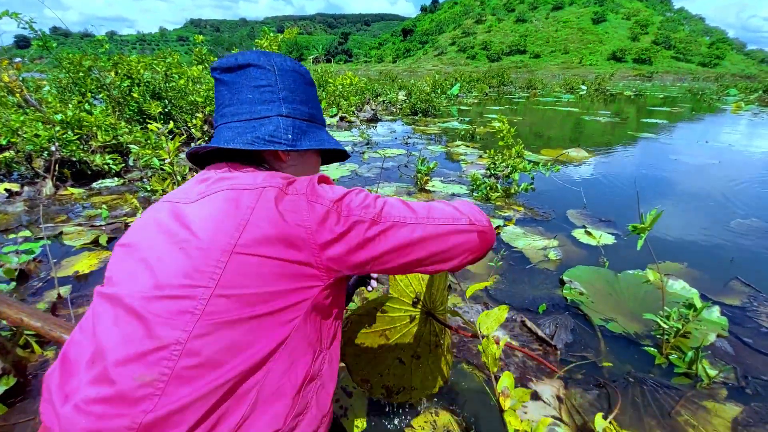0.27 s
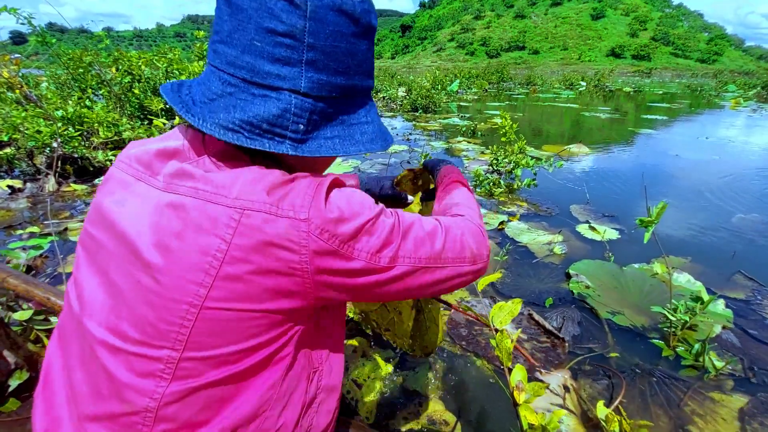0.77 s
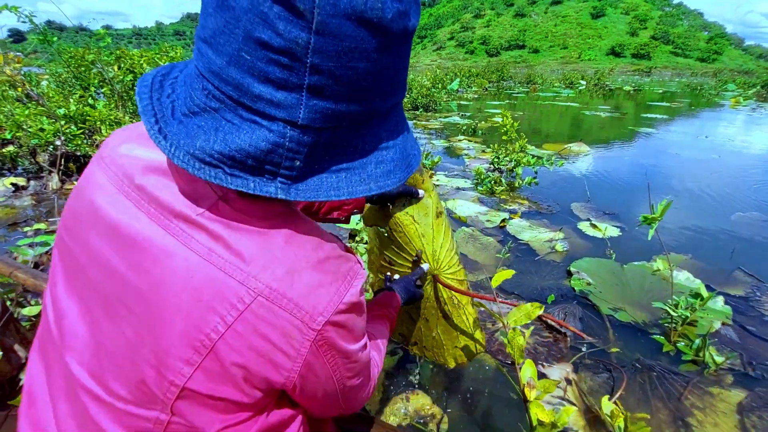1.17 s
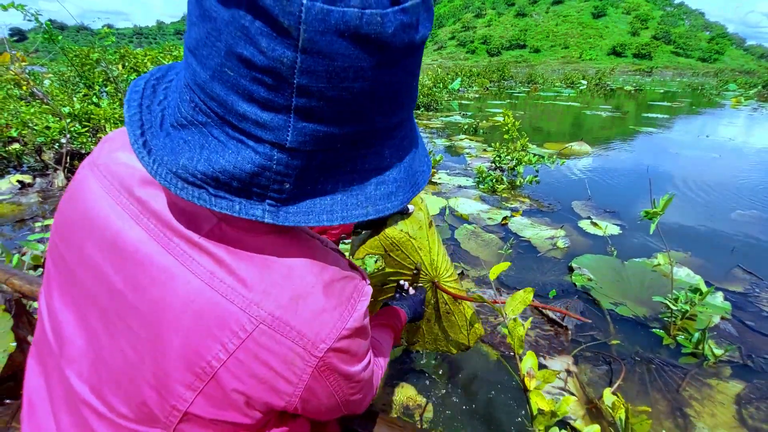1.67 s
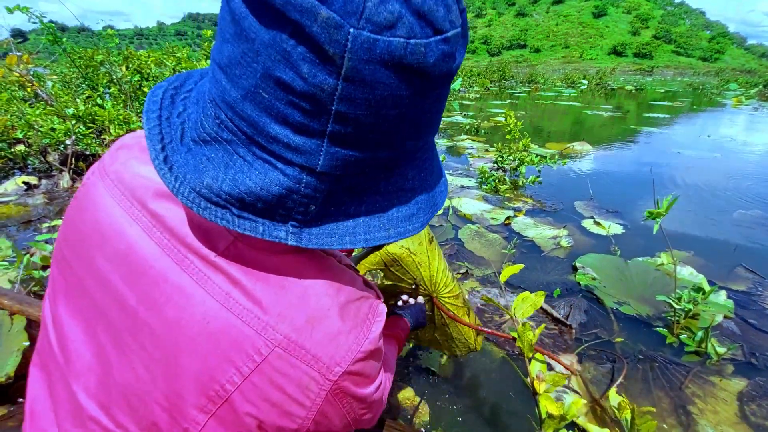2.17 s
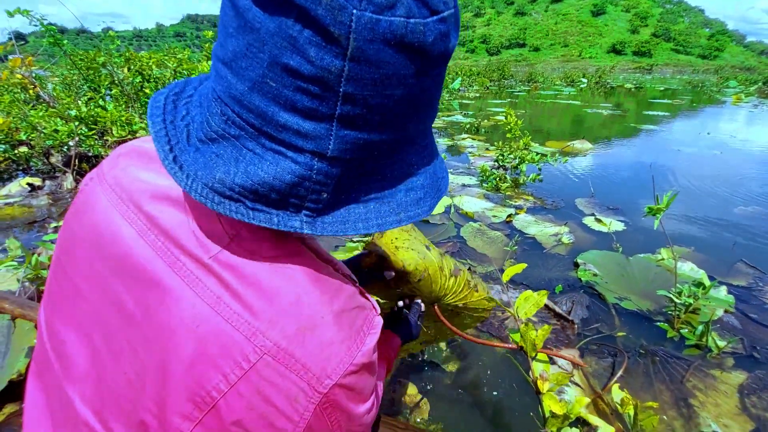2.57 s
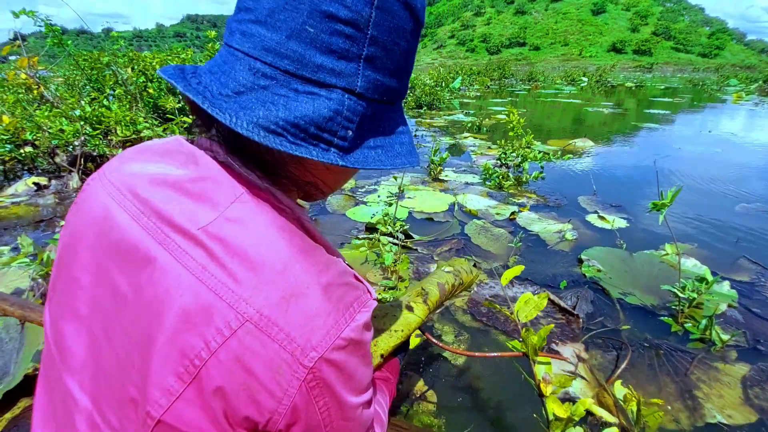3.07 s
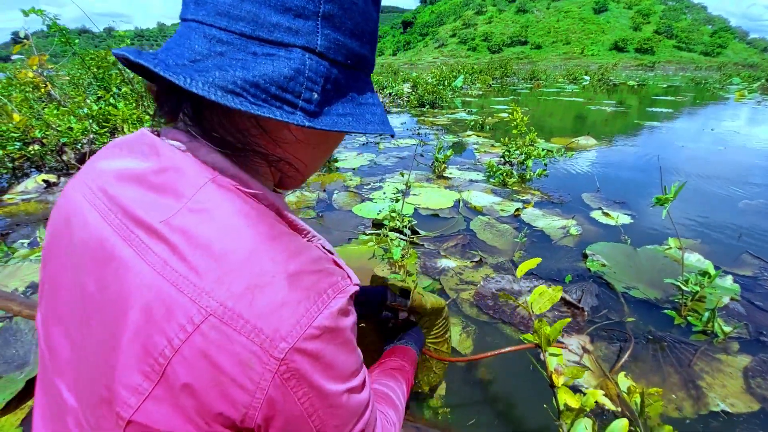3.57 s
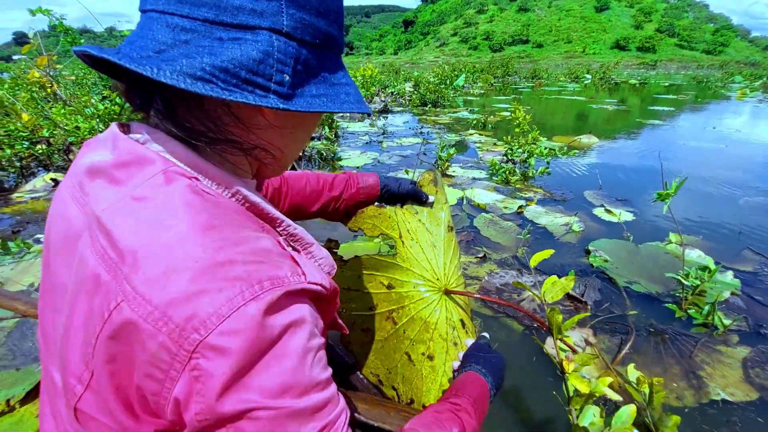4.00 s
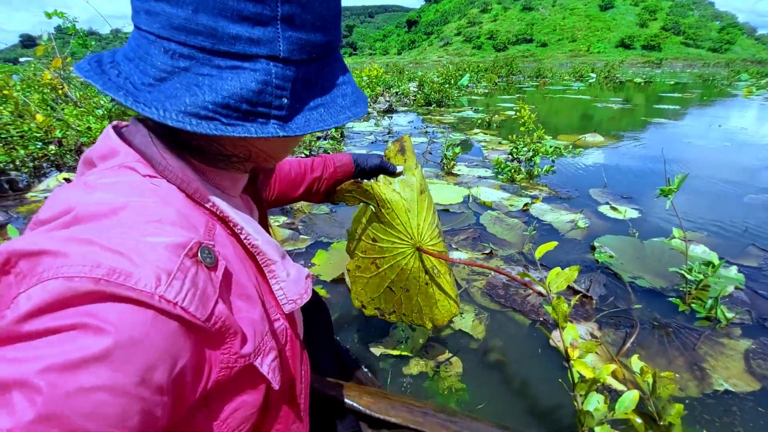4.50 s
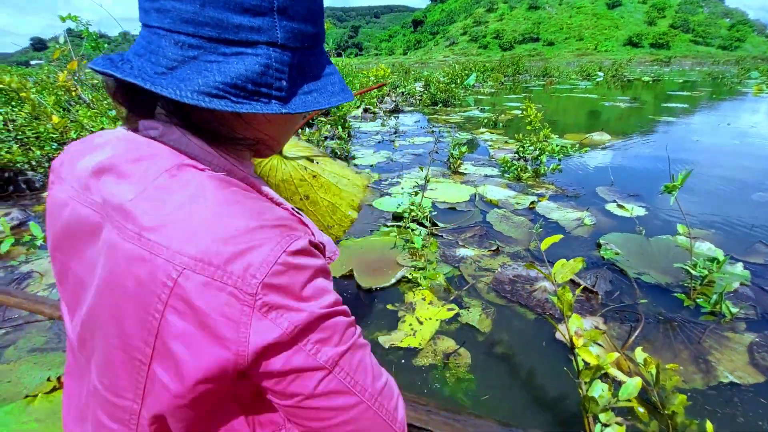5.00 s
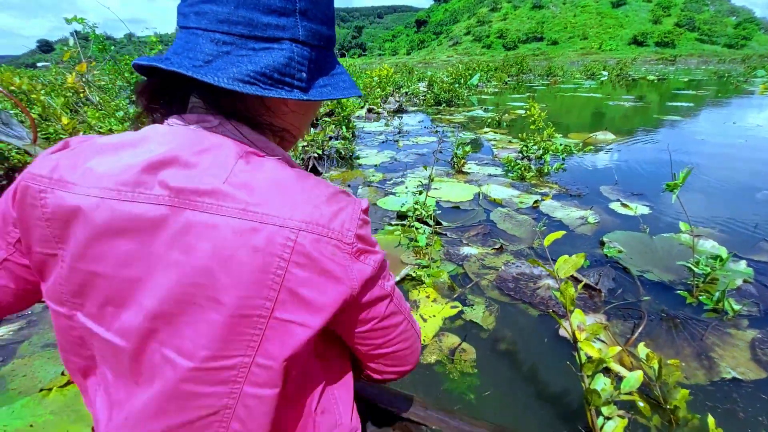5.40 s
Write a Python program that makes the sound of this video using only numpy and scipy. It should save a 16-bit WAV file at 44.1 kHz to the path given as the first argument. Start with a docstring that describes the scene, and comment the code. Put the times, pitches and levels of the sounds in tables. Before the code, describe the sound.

A big wet leaf is crinkled and folded over trickling marsh water, with drips, a small tool clink and a final paddle splash.

```python
"""Folding a wet lotus leaf in a boat

Someone in a wooden boat lifts a big wet leaf out of a marsh and folds it, a little right of the microphone.
Swarms of damped resonances make its crackle and trickle; filtered noise makes the rub of sleeves and the slosh.
Gliding sines are air pockets ringing in the water. A small tool, perhaps a knife, clinks on the boards as sums
of decaying modes, and at the end a paddle digs in as froth and spray. Light wind rumbles on the microphone
as low noise and slow pulses, and a far bird whistles in arched sines."""
import sys
import numpy as np
from scipy import signal
from scipy.fft import rfft, irfft
from scipy.io import wavfile
from scipy.ndimage import uniform_filter1d

SR = 44100
rng = np.random.default_rng(int(sys.argv[2]) if len(sys.argv) > 2 else 0)


def put_to_file(sound):
    """Save the sound as 16-bit audio at rate SR, in the file named by the first command-line argument."""
    columns = np.atleast_2d(sound).T  # one column per channel
    safe = np.clip(columns, -1, 1)
    whole_steps = np.round(safe * 32767)
    wavfile.write(sys.argv[1], SR, whole_steps.astype(np.int16))


N = 249165
T = np.arange(N) / SR
SIDES = np.array([[1], [-1]])  # left, right


def amp(db):
    """Level law: decibels to amplitude ratio."""
    return 10 ** (np.asarray(db) / 20)


def unit(x):
    """Normalisation to unit rms."""
    return x / np.sqrt(np.mean(x ** 2))


def curves(table):
    """Linear interpolation: each column after the first becomes a curve over time."""
    s, *columns = np.transpose(table)
    return [np.interp(T, s, c) for c in columns]


def add(out, s, sound):
    """Superposition: mix a sound in at a time, cut at the end of the scene."""
    i = int(np.clip(s * SR, 0, N - 1))
    out[i:i + len(sound)] += sound[:N - i]


def colour(x, spectrum):
    """Linear filtering by a (Hz, dB) spectrum, falling 12 dB per octave below its first point; rms 1."""
    hz, db = np.transpose(spectrum)
    f = np.maximum(np.arange(N // 2 + 1) * SR / N, 1)
    below = np.minimum(f / hz[0], 1) ** 2
    response = below * amp(np.interp(np.log(f), np.log(hz), db))
    return unit(irfft(rfft(x) * response, N))


def noise(spectrum):
    """Coloured noise: white noise shaped by a spectrum; rms 1."""
    return colour(rng.standard_normal(N), spectrum)


def walk(rate):
    """Random modulation: straight lines between normal random values, `rate` of them per second."""
    return np.interp(T * rate, np.arange(1000), rng.standard_normal(1000))


def fade(t, t60, rise):
    """Damping: quick rise, then exponential decay by 60 dB in t60 seconds; peak 1."""
    shape = (1 - np.exp(-t / rise)) * np.exp(-np.log(1000) * t / t60)
    return shape / shape.max()


def burst(hz, spread, t60, rise):
    """Damped band-limited noise, a puff of at most a quarter second with a peak near 1."""
    t = T[:SR // 4]
    edges = [hz / (1 + spread), min(hz * (1 + spread), SR / 2 - 2000)]
    band = signal.butter(2, edges, "band", fs=SR, output="sos")
    hiss = signal.sosfilt(band, rng.standard_normal(len(t)))
    return unit(hiss) * fade(t, t60, rise) / 2


def ping(hz, t60, glide=0, rise=0.00085, phase=0):
    """One damped resonance, whose pitch may glide in octaves per second."""
    t = T[:int(t60 * SR) + 2]
    cycles = np.cumsum(hz * 2 ** (glide * t)) / SR
    return np.sin(phase + 2 * np.pi * cycles) * fade(t, t60, rise)


def ring(modes, rise):
    """Modal superposition: all the modes of a struck body at random phases, peak 1."""
    out = np.zeros(SR // 4)
    for hz, db, t60 in modes:
        tone = ping(hz, t60, rise=rise, phase=rng.uniform(0, 2 * np.pi))
        out[:len(tone)] += amp(db) * tone
    return out / np.abs(out).max()


def grains(centre_hz, octaves, cycles, scatter_db, glide, count):
    """Granular superposition: tiny resonances about a pitch, mostly faint, a few strong; evened to rms near 1."""
    out, centre_hz = np.zeros(N), np.broadcast_to(centre_hz, N)
    for when, pitch, size, life in rng.random((count, 4)):
        hz = centre_hz[int(when * N)] * 2 ** (octaves * (2 * pitch - 1))
        t60 = cycles * (.5 + life) / hz
        add(out, when * T[-1], amp(-scatter_db * np.log(1 - size)) * ping(hz, t60, glide))
    slow_power = uniform_filter1d(out ** 2, SR // 12)
    return out / np.sqrt(slow_power + 1e-9)


def place(x, pan_db, scatter, lag_s=0):
    """Scattering: the right port hears directly; the left partly by way of the body and the boat, which smear it.

    pan_db is left minus right; scatter is the smeared share of the left port's power; lag_s delays the rest."""
    t = T[:SR // 20]
    smear = rng.standard_normal(len(t)) * fade(t, 0.021, .0001)
    scattered = signal.fftconvolve(x, smear / np.linalg.norm(smear))[:N]
    late = np.roll(x, round(lag_s * SR))
    left = np.sqrt(1 - scatter) * late + np.sqrt(scatter) * scattered
    return np.array([left * amp(pan_db / 2), x * amp(-pan_db / 2)])


def swells(movements, rest_db):
    """Addition of powers: movements build as a Gaussian and die exponentially over a resting level; gives a gain."""
    power = amp(rest_db) ** 2
    for s, swell_s, fade_s, db in movements:
        away = np.where(T < s, ((T - s) / swell_s) ** 2, (T - s) / fade_s)
        power = power + (amp(db) * np.exp(-away)) ** 2
    return np.sqrt(power)


def outdoors():
    """Turbulent pressure: low wind noise, partly independent at each port, over the quiet hiss of the open marsh."""
    # strength of the wind on the microphone: start_s, relative level_db
    wind_strength = [(0.0, -61), (0.6, -58.5), (0.75, -58.5), (0.91, -63), (1.67, -59), (1.73, -58.5),
                     (2.86, -56.5), (3.01, -58.5), (3.9, -63), (4.31, -58), (4.69, -58), (5.02, -65),
                     (5.44, -57), (5.65, -59)]
    # spectrum of the wind rumble: frequency_hz, relative density_db
    gust = [(22, -30), (32, -18), (46, 6.5), (62, 5.5), (90, 2), (125, 1.5), (166, -6.5), (260, -20.5),
            (500, -47.5)]
    # spectrum of the open air: frequency_hz, relative density_db
    air_spectrum = [(150, 3), (400, -3.5), (750, -8), (1050, -12), (1500, -26), (2300, -20), (3400, -30),
                    (4500, -14), (6000, -26), (8500, -42.5), (11000, -14), (14000, -31), (16000, -22)]
    gust_db = curves(wind_strength)[0] + 2 + 2 * walk(22)
    wind = (noise(gust) + 0.66 * SIDES * noise(gust)) * amp(gust_db)
    air_db = -70.5 - 1.5 * SIDES + 0.27 * walk(8.5)  # the right side is louder
    air = (noise(air_spectrum) + 0.97 * SIDES * noise(air_spectrum)) * amp(air_db)
    return wind + air


def buffets():
    """Damped oscillation: each buffet of wind pushes the two ports unequally through a few slow cycles."""
    # single buffets: start_s, peak_db (mean of the ports), pitch_hz, t60_s, left_minus_right_db
    pushes = [(0.632, -45, 79, .07, 26), (0.663, -45, 55.7, 0.17, 13), (0.701, -42, 91, 0.079, 13),
              (2.621, -40, 60, 0.15, -9), (2.856, -39.5, 82, 0.14, .5), (2.924, -44, 99.6, 0.18, -22),
              (3.353, -46, 85, 0.1, -10), (4.136, -44.5, 82, 0.1, -19), (5.43, -48.5, 100, 0.29, 16)]
    out = np.zeros((2, N))
    for s, db, hz, t60, pan_db in pushes:
        push = ping(hz, t60, rise=0.0011)
        add(out[0], s, amp(db + pan_db / 2) * push)
        add(out[1], s, amp(db - pan_db / 2) * push)
    return out


def bird():
    """Frequency modulation: thin whistles from the reeds whose pitch follows an arch and trembles."""
    # whistles: start_s, length_s, start_hz, middle_hz, end_hz, level_db
    whistles = [(2.23, .06, 2750, 2900, 3000, -75), (2.68, .05, 3550, 3620, 3550, -73),
                (2.87, .115, 2510, 2510, 2410, -73), (3.21, .175, 3750, 4370, 3450, -67),
                (3.48, .14, 3400, 3600, 2700, -69)]
    out = np.zeros(N)
    for s, length, start_hz, middle_hz, end_hz, db in whistles:
        u = np.linspace(0, 1, int(length * SR))
        arch = np.polyfit([0, .5, 1], [start_hz, middle_hz, end_hz], 2)
        hz = np.polyval(arch, u) * (1 + 0.0064 * walk(138)[:len(u)])
        flutter_db = 3 * walk(70)[:len(u)]
        envelope = np.sqrt(np.abs(np.sin(np.pi * u)))
        add(out, s, amp(db + flutter_db) * envelope * np.sin(2 * np.pi * np.cumsum(hz) / SR))
    return place(out, 0, .2)


def boat():
    """Damped hull resonance and friction: dull knocks, and a jacket rubbing close and wide as the weight shifts."""
    # shifts of the body's weight: height_s, swell_s, fade_s, relative level_db
    shifts = [(.18, 0.056, 0.14, -59.5), (.42, 0.027, 0.035, -48.5), (1.25, 0.45, 0.3, -64),
              (1.73, 0.075, 0.16, -56), (2.57, 0.16, 0.13, -61), (3.01, 0.25, 0.2, -57.5),
              (3.31, 0.075, 0.048, -59.5), (4.2, 0.27, 0.23, -61), (4.71, 0.016, 0.055, -51),
              (5.05, 0.024, 0.095, -53), (5.16, 0.02, 0.021, -46.5), (5.53, 0.025, 0.065, -51.5)]
    # spectrum of the rubbing jacket: frequency_hz, relative density_db
    cloth = [(100, -2), (190, 0), (300, 0.5), (450, -12.5), (800, -19), (2000, -67.5)]
    # dull knocks on the hull: start_s, peak_db, pitch_hz, t60_s
    knocks = [(0.311, -46, 197, .27), (2.129, -40, 201, 0.023), (4.844, -49, 137.3, 0.32),
              (5.146, -57, 246, .08)]
    shifting = swells(shifts, rest_db=-66) * amp(-2)
    out = noise(cloth) * shifting
    for s, db, hz, t60 in knocks:
        add(out, s, amp(db) * ping(hz, t60, rise=0.00098))
    return out + 0.35 * SIDES * noise(cloth) * shifting


def droplets(count=120):
    """Random impacts: tiny drops tick on the wet leaf all the while, each a short band of noise."""
    out = np.zeros(N)
    for when, pitch, size in rng.random((count, 3)):
        db = -56 + 3 * min(-np.log(1 - size), 3)
        add(out, when * T[-1], amp(db) * burst(9000 + 5500 * pitch, .2, .012, .0002))
    return place(out, -2.5, 1.0)


def water():
    """Bubble resonance: trapped air pockets ring as gliding sines, beside noisy slaps of water and wet leaf."""
    # ringing air pockets: start_s, relative peak_db, pitch_hz, t60_s, glide_octaves_per_s
    bubbles = [(0.168, -48, 540, 0.05, -7), (.4254, -31.5, 1178, 0.026, 2), (0.4258, -43, 3680, .025, 9),
               (.458, -47.5, 1150, 0.034, 2), (.554, -58.5, 1146, 0.085, 1), (0.609, -51, 4980, .025, -15),
               (0.651, -47, 4800, 0.025, -3), (.741, -49, 570, 0.022, 0), (.8068, -41.5, 4420, 0.021, 3),
               (1.2, -49.5, 543, 0.033, -16), (1.287, -50, 575, 0.087, -8), (1.641, -59, 2250, 0.053, 1),
               (1.73, -40.5, 574, 0.032, -10), (2.055, -48.5, 800, 0.081, 38.5),
               (1.809, -58, 860, 0.023, 5), (2.057, -57.5, 1900, 0.074, 22), (2.216, -63.5, 2210, .09, 2),
               (2.336, -47.5, 1320, 0.025, -5), (2.601, -40, 5300, 0.011, -5), (2.637, -48, 3270, .04, 8),
               (2.775, -57.5, 2420, .047, 6), (3.419, -54, 3340, .03, 8), (3.559, -57, 2350, 0.035, 0),
               (3.652, -59, 1920, 0.052, -10), (4.565, -56, 2980, 0.031, -8), (4.802, -56, 2970, .03, -2),
               (5.5209, -41.5, 2460, 0.08, -2.5), (5.584, -33.5, 1520, 0.011, 40),
               (5.593, -34.5, 1590, 0.024, -50), (5.5986, -33.5, 1215, 0.045, -66.5),
               (5.608, -36.5, 497, 0.026, 2), (5.632, -33, 1215, 0.031, -5),
               (5.6425, -29, 825, 0.0083, -23)]
    # small slaps: start_s, relative peak_db, centre_hz, t60_s
    slaps = [(0.312, -54.5, 1660, 0.38), (0.42, -42.5, 1460, 0.098), (0.664, -50.5, 2740, 0.11),
             (.803, -48.5, 1490, .088), (1.675, -51, 704, 0.11), (1.729, -47, 815, 0.12),
             (1.787, -52.5, 740, 0.24), (1.995, -56.5, 1650, 0.067), (2.134, -52, 475, 0.055),
             (2.055, -58, 2180, .077), (2.099, -54.5, 1590, 0.063), (2.337, -47, 1600, 0.028),
             (2.358, -52, 3200, .04), (2.582, -47, 610, 0.079), (2.633, -45, 3280, 0.08),
             (2.992, -44, 3370, 0.057), (2.998, -42.5, 800, 0.067), (3.087, -51, 756, 0.22),
             (3.168, -49.5, 800, 0.06), (3.311, -51.5, 660, 0.33), (3.583, -45.5, 3440, 0.064),
             (4.045, -54.5, 1620, 0.16),  (4.7001, -34.5, 740, 0.054), (4.701, -43, 2180, 0.059),
             (4.7605, -38.5, 890, 0.045), (5.519, -34, 2730, 0.064)]
    out = np.zeros(N)
    for s, db, hz, t60, glide in bubbles:
        add(out, s, amp(db) * ping(hz, t60, glide, rise=0.00041))
    for s, db, hz, t60 in slaps:
        add(out, s, amp(db) * burst(hz, 0.39, t60, 0.00017))
    return place(out, -8, 0.084, lag_s=.0001)


def paddle():
    """Entrained air and spray: the paddle blade churns up froth and bubbles and throws fine drops."""
    # the stroke: time_s, relative churn_db, relative spray_db
    stroke_levels = [(5.498, -80, -89), (5.507, -46, -56), (5.521, -42.5, -58), (5.535, -46, -56),
                     (5.563, -44, -54.5), (5.578, -52.5, -60), (5.6, -42, -52), (5.62, -43.5, -60),
                     (5.65, -39, -59)]
    # spectrum of the churned water: frequency_hz, relative density_db
    churn = [(120, -17), (400, -13), (800, 4.5), (1500, 6), (2500, 1), (4000, -7.5), (8000, -27)]
    # spectrum of the fine spray: frequency_hz, relative density_db
    spray = [(1500, -20), (4000, 5.5), (6000, -6), (9000, -9), (12500, -3.5), (16000, -16)]
    churn_db, spray_db = curves(stroke_levels)
    bubbles = grains(1150, 1.35, cycles=10, scatter_db=2, glide=10, count=4000)
    froth = unit(noise(churn) + amp(-3) * bubbles)
    stroke = froth * amp(churn_db) + noise(spray) * amp(spray_db)
    begun = T > stroke_levels[0][0]
    return place(stroke * begun, -5.0, 0.82, lag_s=.00015)


def knife():
    """Modal impact: every bounce rings blade, edge and board in its own mix; the hull scatters a short tail."""
    # landing and bounces: start_s, relative blade_db, relative edge_db, relative board_db
    bounces = [(4.6139, -18, -33, -36.5), (4.6262, -12.5, -21.5, -23), (4.629, -33, -7.5, -28),
               (4.6723, -38.5, -47.5, -27.5), (4.6754, -44, -22, -40.5)]
    # modes of the blade: frequency_hz, relative level_db, t60_s
    blade_modes = [(4660, -1, .017), (4800, -1, .015), (5020, -3, .012), (5310, -1, .013)]
    # modes of its edge: frequency_hz, relative level_db, t60_s
    edge_modes = [(7650, -12, .018), (8890, -2, .021), (9700, -4, .011), (10150, -4, .012),
                  (10700, -4, .014), (11100, -5, .014), (12350, -4, .012), (12720, 0, .014),
                  (13100, -2, .012), (13780, -4, .012), (14500, -9, .011)]
    # modes of the board: frequency_hz, relative level_db, t60_s
    board_modes = [(482, -9, 0.05), (706, -11.5, 0.025), (920, -23.5, 0.044), (1366, -3, 0.02),
                   (1770, -12.5, 0.069), (2135, -0.5, 0.019), (2446, -1, 0.014), (3240, -14, 0.0085)]
    out = np.zeros(N)
    for s, blade_db, edge_db, board_db in bounces:
        clatter = amp(-33) * burst(4200, .9, .09, .002)
        crack = amp(-3) * burst(10500, 0.31, 0.014, .0001)
        thud = amp(-3) * burst(2800, 1.7, 0.05, .0002)
        blade = ring(blade_modes, rise=.001) + clatter
        edge = ring(edge_modes, rise=0.000067) + crack
        board = ring(board_modes, rise=0.000088) + thud
        add(out, s, amp(blade_db) * blade + amp(edge_db) * edge + amp(board_db) * board)
    return place(out * amp(-1.5), -8.0, 0.92, lag_s=.000023)


def ticks():
    """Impulsive excitation: drops and creases tick as a bright crack with a lower snap of the leaf under it."""
    # ticks: start_s, relative peak_db, t60_s, snap_db (relative to the crack)
    leaf_ticks = [(0.393, -42, .013, -26), (.414, -37, .027, -15), (0.4205, -32.5, .025, -13.5),
                  (0.4263, -38.5, 0.023, -9), (0.432, -33, 0.017, -22), (.4533, -42, 0.015, -19),
                  (0.4578, -45, .033, -1), (0.616, -48, .012, -22), (.664, -49.5, 0.024, -4),
                  (.806, -63, 0.026, -1), (.874, -48.5, 0.027, -1), (1.189, -45, 0.022, -21),
                  (1.407, -42, .018, -11), (1.615, -45, 0.012, -36), (1.864, -48.5, 0.022, -35),
                  (2.0, -41, 0.018, -30), (2.052, -59, .015, -24), (2.1355, -36, 0.019, -15),
                  (2.3344, -37.5, 0.022, -14), (2.3935, -44, .01, -25), (2.4413, -44.5, .019, -7),
                  (2.581, -39.5, 0.018, -5), (2.586, -34, 0.014, -25), (3.177, -52, .019, -22),
                  (3.313, -46, 0.02, 3), (3.5195, -48, 0.045, -0.5), (3.735, -53, .014, -6),
                  (4.075, -49.5, 0.032, -4.5), (4.758, -37.5, 0.016, 0), (4.939, -46, 0.0085, -7.5),
                  (4.977, -51, .015, -1), (5.002, -40, 0.0089, -13.5), (5.072, -48.5, .012, -32),
                  (5.5203, -40.5, .014, 5.5), (5.642, -43, 0.018, 5.5)]
    out = np.zeros(N)
    for s, db, t60, snap_db in leaf_ticks:
        crack = burst(13150, 0.31, t60, 0.0001)
        snap = amp(snap_db) * burst(4800, 0.29, t60, 0.0001)
        add(out, s, amp(db) * (crack + snap))
    return place(out, -8.5, 0.8, lag_s=.000023)


def leaf_motion():
    """Common excitation: each stroke drives crinkle, rubbing and running water; also gives the crease pitch in Hz."""
    # hands on the leaf: height_s, swell_s, fade_s, relative crinkle_db, rub_db and water_db, crease_hz
    strokes = [(.02, 0.06, 0.42, -68, -66.5, -72, 3950), (.18, 0.014, 0.021, -66.5, -78, -63, 2180),
               (0.429, .025, 0.11, -59, -58, -65.5, 3670), (.72, 0.026, 0.035, -60.5, -61.5, -82, 4300),
               (0.784, 0.05, 0.14, -60.5, -58.5, -62.5, 3630), (1.14, 0.056, 0.086, -63, -71, -62, 2270),
               (1.28, 0.055, 0.13, -68.5, -66.5, -60.5, 3340), (1.52, 0.042, 0.052, -68, -75, -92, 3500),
               (1.67, 0.11, 0.077, -68, -66, -88, 4440), (1.77, 0.071, 0.043, -68.5, -68, -64, 2530),
               (2.05, 0.052, 0.2, -71, -74.5, -66.5, 2400), (2.29, 0.023, 0.021, -69, -75, -81, 3930),
               (2.355, 0.017, 0.11, -71.5, -68, -67, 2400), (2.45, 0.022, 0.14, -64.5, -67, -65, 4000),
               (2.62, 0.061, 0.14, -62.5, -62, -68, 4020), (3.0, 0.013, 0.13, -61, -67, -57, 2640),
               (3.17, .04, 0.059, -63.5, -76, -66.5, 2430), (3.33, 0.07, 0.27, -69.5, -68.5, -84, 4480),
               (3.59, 0.055, 0.11, -61, -64, -71, 2710), (3.93, 0.074, 0.11, -69.5, -71.5, -64, 2650),
               (4.05, 0.034, 0.068, -59, -65, -59, 2100), (4.2, 0.065, 0.1, -62, -58, -57, 2490),
               (4.27, 0.036, 0.22, -60.5, -63, -64, 2040), (4.52, 0.15, 0.027, -67, -70, -85, 4210),
               (4.76, 0.099, 0.071, -65, -69, -56, 3470), (4.98, 0.099, .03, -72, -73.5, -68.5, 4700),
               (5.15, 0.17, 0.27, -69.5, -74, -63.5, 2430)]
    s, swell_s, fade_s, crinkle_db, rub_db, water_db, crease_hz = np.transpose(strokes)
    # the resting levels are low but never silent: the leaf is never quite still
    effort = swells(zip(s, swell_s, fade_s, crinkle_db), rest_db=-87.5)
    rub = swells(zip(s, swell_s, fade_s, rub_db), rest_db=-79.5)
    flow = swells(zip(s, swell_s, fade_s, water_db), rest_db=-76.5)
    return effort, rub, flow, np.interp(T, s, crease_hz)


def handling():
    """Crackling and friction: water runs off the leaf; its skin crinkles at the fold's pitch and rubs on sleeves."""
    # spectrum of sloshing water: frequency_hz, relative density_db
    slosh_spectrum = [(250, -11), (480, 5.5), (900, -4), (1400, 0), (2200, -9), (4000, -26)]
    # spectrum of the rubbing: frequency_hz, relative density_db
    rustle_spectrum = [(3000, -1), (6000, -2.5), (9000, -5.5), (12000, -3.5), (14500, -2.5), (16500, -33)]
    # where the leaf is held: time_s, relative left_minus_right_db
    leaf_pan = [(0.0, -5), (0.57, -3), (0.73, -9), (0.9, -0.5), (1.08, -10.5), (3.47, -9), (4.26, -5),
                (4.55, -9)]
    effort, rub, flow, fold_hz = leaf_motion()
    trickle = grains(815.5, 1, cycles=43, scatter_db=4.5, glide=4.3, count=3200) * amp(-5)
    slosh = noise(slosh_spectrum) * amp(-4)
    crinkle = grains(fold_hz, 0.46, cycles=22, scatter_db=4.0, glide=15, count=3200) * amp(-5)
    crumple = grains(3000, 0.8, cycles=4.0, scatter_db=2.8, glide=0, count=9000) * amp(-4)
    catches = np.repeat(rng.standard_normal(N // 64 + 1), 64)[:N]  # catches and slips every 1.5 ms
    rough = rng.standard_normal(N) * amp(3.8 * catches)
    rustle = colour(rough, rustle_spectrum) * amp(-2)
    pan_db = curves(leaf_pan)[0] - 2
    running = place((trickle + slosh) * flow, -3.5, 0.74, lag_s=.0002)
    folding = place((crinkle + crumple) * effort, pan_db, 1.0)
    rubbing = place(rustle * rub, pan_db - 2.5, 1.0)
    return running + folding + rubbing


def scene():
    """Superposition of all sources in the open air, with no echo."""
    surroundings = outdoors() + buffets() + bird() + boat()
    return surroundings + droplets() + water() + paddle() + knife() + ticks() + handling()


def record(dry):
    """Band limitation: the recorder cuts the top above 15.9 kHz."""
    return signal.sosfilt(signal.ellip(10, .2, 80, 15900, fs=SR, output="sos"), dry)


dry = scene()
out = record(dry)
put_to_file(out)
```